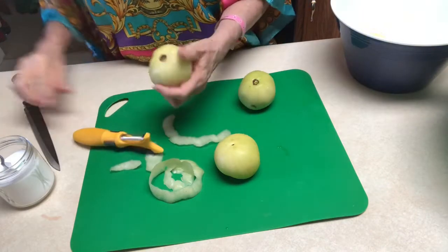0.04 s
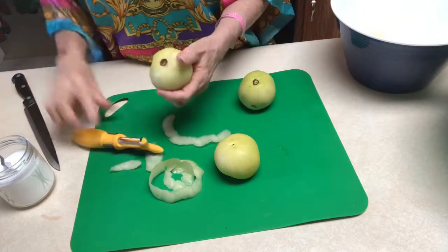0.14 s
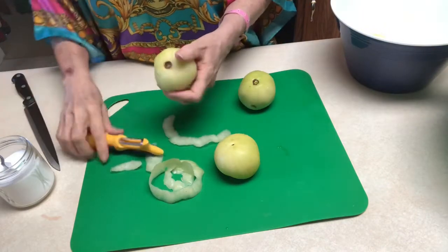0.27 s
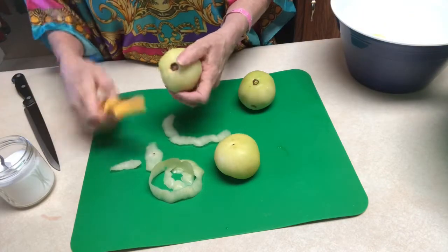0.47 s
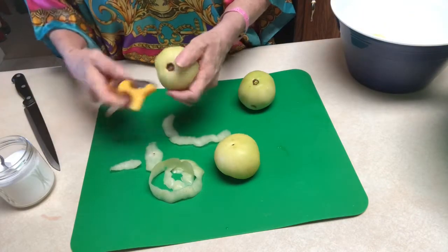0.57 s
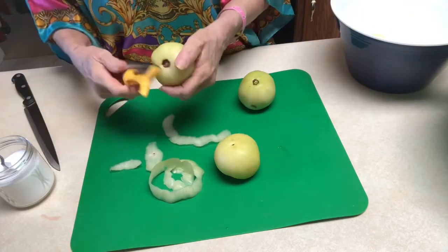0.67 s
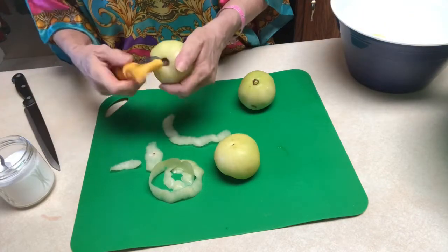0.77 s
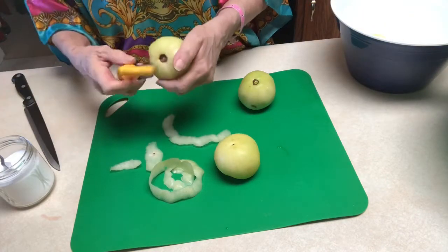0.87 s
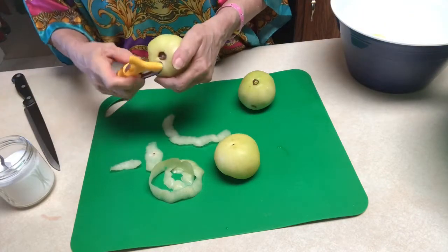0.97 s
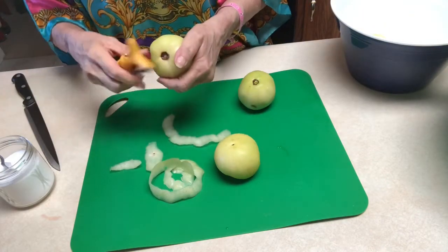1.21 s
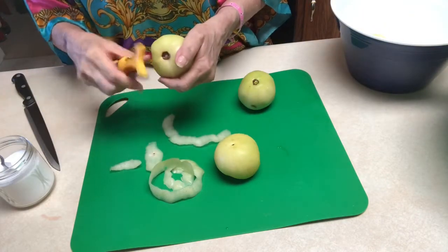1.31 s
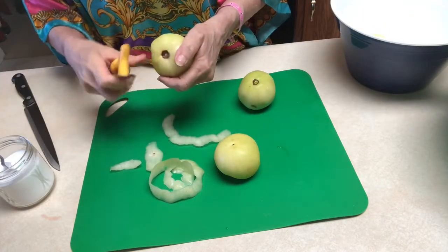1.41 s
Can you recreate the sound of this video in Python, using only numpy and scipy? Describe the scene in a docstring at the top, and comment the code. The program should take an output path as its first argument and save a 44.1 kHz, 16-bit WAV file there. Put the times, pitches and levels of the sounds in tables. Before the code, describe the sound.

Vegetable peeler clatters off a cutting board, then clicks and scrapes lightly over firm tomato skin

```python
"""A faint hollow ring dies away over room air and a low hum; fingers brush, then a peeler is picked up.
Its plastic handle knocks and skids with a short judder: pulses excite damped modes of handle and counter.
Its loose steel blade ticks (noise bursts and modal rings) and rasps over the skin of a firm tomato in
short strokes (filtered friction noise). Decaying noise gives the brief reverberation of a small kitchen."""
import sys
import numpy as np
from scipy import signal
from scipy.fft import rfft, irfft, next_fast_len
from scipy.io import wavfile

SR = 44100
rng = np.random.default_rng(int(sys.argv[2]) if len(sys.argv) > 2 else 0)


def int16_out(signal):
    """Quantize to a 16-bit WAV file."""
    q = np.round(np.clip(np.atleast_2d(signal).T, -1, 1) * 32767)
    wavfile.write(sys.argv[1], SR, q.astype(np.int16))


N = 63945  # length of the scene in samples

# Handle knocks on the board: [t/s, level/dB, contact time/ms, crack level/dB, counter thump level/dB]
KNOCKS = [(0.2163, -25.5, 0.2, -10.5, -41), (0.2223, -30.5, 0.14, -20, -43), (0.2265, -28, 0.58, -34, -44),
          (0.2358, -45, 0.18, -23, -54), (0.239, -40, .2, -20, -75), (0.2547, -34.5, 0.27, -42, -43.5)]
# Skids of the handle on the board: [t/s, length/s, slip rate f/Hz, level/dB, grit level/dB]
SKIDS = [(0.2391, 0.011, 1395, -27.5, -31), (0.2514, .0035, 1482, -26.5, -32.5)]
# Modes of the handle lying on the board: [f/Hz, relative level/dB, t60/s]
HANDLE_MODES = [(934, -5, 0.039), (1068, -1, 0.058), (1228, -2.5, 0.034), (1326, -12, 0.073),
                (1481, -5.5, 0.034), (1907, -8.5, 0.064), (2160, -13, 0.025), (2639, -17, 0.031),
                (3168, -19, 0.033), (3630, -25, 0.05), (3850, -44, 0.013), (4680, -21, 0.034),
                (5810, -26, 0.036), (6500, -17.5, 0.027), (7460, -29, 0.023)]
# Modes of the counter: [f/Hz, relative level/dB, t60/s]
COUNTER_MODES = [(123, -22, 0.093), (140.7, 3, 0.12), (251, -4, 0.11), (361, 0.5, 0.086)]
# Spectrum of the contact crack and skid grit: [f/Hz, relative level/dB]
CRACK_SPECTRUM = [(200, -39), (600, 7), (900, 11.5), (1300, -9), (2000, 7), (3300, 2.5), (4600, 5.5),
                  (5300, -6), (7500, -9), (10000, -18.5), (16000, -27)]
# Ticks of the loose blade in its pivots: [t/s, click level/dB, ring level/dB, strongest ringing f/Hz]
TICKS = [(0.3713, -37, -69, 5140), (0.4412, -55, -66.5, 7440), (0.4808, -30.5, -66, 6360),
         (0.4900, -45, -58, 5300), (0.5502, -25, -66, 5200), (0.5582, -21.5, -75, 5700),
         (0.5695, -37, -59, 5700), (0.6693, -30, -67, 5200), (0.7306, -34.5, -59, 3800),
         (0.7470, -42, -58, 5050), (0.7622, -27, -77, 6500), (0.7707, -56, -81, 5200),
         (0.795, -30, -56, 4770), (0.811, -47, -60.5, 5150), (0.8620, -30.5, -82, 4800),
         (0.8767, -32, -57, 10300), (0.9050, -55, -65, 5190), (1.03, -36, -69, 4860),
         (1.0390, -54, -86, 4800), (1.2152, -41, -58, 2480), (1.2700, -39, -59, 12600),
         (1.3707, -55, -54, 2430), (1.4180, -44, -69, 8450)]
# Modes of the steel blade: [f/Hz, relative level/dB, t60/s]
BLADE_MODES = [(2490, 0, .06), (4790, -6, .1), (5190, 0, .16), (5696, -4, .28), (6444, -3, .12),
               (8520, -6, .09), (9168, -11, .28), (9778, -2, .19), (14180, -1, .14)]
# Rasps of the blade: [t/s, length/s, level/dB, treble tilt/(dB per octave), contact resonance f/Hz]
RASPS = [(0.378, .014, -60, -4, 4950), (0.439, .012, -61.5, 1, 8300), (0.48, 0.035, -60, 1.5, 5300),
         (0.507, 0.0174, -53, 0.5, 5360), (0.539, 0.019, -56.5, -2.5, 6000), (0.558, 0.019, -45, 0, 3100),
         (0.679, 0.018, -58, -.5, 8100), (0.742, 0.02, -50, -2.5, 5000), (0.760, 0.02, -46.5, 1.5, 6100),
         (0.775, .040, -60.5, -0.5, 5160), (0.809, 0.012, -53, 3, 5300), (0.876, .015, -55, -2, 3700),
         (1.015, .036, -63, -4.5, 4900), (1.215, .006, -58.5, 6.5, 7700), (1.261, 0.022, -55, 1, 6750),
         (1.372, 0.0099, -67, 1.5, 4670), (1.4155, 0.0073, -60.5, 8, 8300)]
# Spectrum of blade rasps and clicks: [f/Hz, relative level/dB]
RASP_SPECTRUM = [(300, -19.5), (1000, -19), (1800, -9.5), (2400, -6), (3200, -1), (4100, -3), (5200, 1),
                 (6000, -5.5), (7700, -4.5), (9500, -11), (11000, -12), (13000, -19), (14500, -18),
                 (16000, -31)]
# Finger brushes on fruit and board: [t/s, length/s, level/dB, treble tilt/(dB per octave),
# contact resonance f/Hz]
BRUSHES = [(0.085, .05, -64.5, 5, 2700), (0.172, 0.054, -60, -4, 1390), (1.01, 0.036, -63, -10, 1190),
           (1.085, 0.043, -66.5, -0.5, 980)]
# Spectrum of the finger brushes: [f/Hz, relative level/dB]
BRUSH_SPECTRUM = [(200, -15), (700, 1), (1200, 7), (2600, 1), (5000, -14), (12000, -43)]
# Bands of the hollow ring: [centre f/Hz, full width at half amplitude/Hz, initial rms level/dB]
FADING_BANDS = [(587, 61, -51), (650, 160, -51), (358, 220, -54.5), (1390, 6600, -56)]
# Spectrum of the room reflections: [f/Hz, relative level/dB]
ROOM_SPECTRUM = [(100, -5.5), (400, -4), (800, 2), (980, -2), (1130, 0), (1380, -7), (1580, 3), (1760, -14),
                 (2150, -2), (2900, -1), (4600, 0.5), (9000, 0), (15000, 3.5)]
# Spectrum of the room air: [f/Hz, relative level per Hz/dB]
AIR_SPECTRUM = [(18, -35), (30, -34), (95, -4), (165, -3), (499, -2), (1250, -14.5), (1590, -18.5),
                (2480, -19), (2750, -22.5), (3980, -21), (5040, -26), (5450, -22), (6210, -25.5),
                (11700, -34.5), (16000, -41.5)]
# Tones of the appliance hum: [f/Hz, rms level/dB]
HUM = [(60, -74), (119, -70.5), (237, -73.5), (359, -81)]

CRACK_DECAY_S, TICK_DECAY_S = 0.002, 0.0012  # time constants of the noise bursts
SLIP_JITTER = 0.25  # relative spread of the slip rate, drawn anew at each sample
BOARD_LOW_HZ = 107
RING_FALL_DB_PER_OCTAVE = 11
CATCHES_PER_S, CATCH_DECAY_S = 1400, 0.00042
STROKE_RISE, STROKE_FALL = 0.22, 0.18  # shares of the stroke length
CONTACT_DB, CONTACT_OCTAVES = 3, 0.17  # height, and half width at half height, of the contact resonance
ROOM_DB, ROOM_T60_S, ROOM_TREBLE_T60_S, ROOM_BUILD_S = -8.5, 0.43, 0.27, 0.0033
ROOM_SPLIT_HZ = 3000
FADING_T60_S = 0.25
AIR_DB = -60  # rms level
TOP_HZ = 15900


def undb(db):
    """Level definition: an amplitude ratio is ten to the power of level/20."""
    return 10 ** (np.asarray(db) / 20)


def unit(x):
    """Mean-square normalisation: scale a signal to rms 1."""
    return x / np.sqrt(np.mean(x ** 2) + 1e-20)


def add(out, at_s, x):
    """Superposition: add a sound to the scene at a given time."""
    start = max(int(at_s * SR), 0)
    out[start:start + len(x)] += x[:N - start]


def high_pass(x, order, hz):
    """Butterworth filtering: suppress what lies below the cutoff."""
    return signal.sosfilt(signal.butter(order, hz, "high", fs=SR, output="sos"), x)


def colour(x, points, tilt_db=0):
    """Minimum-phase filtering: a folded cepstrum makes a spectrum causal, tilted about 5 kHz."""
    size = 2 * next_fast_len(len(x) // 2 + 2048)
    octave = np.log2(np.maximum(np.fft.rfftfreq(size, 1 / SR), 1))
    hz, db = np.array(points).T
    # the tilt stays constant from three octaves below its pivot downwards
    slope = np.maximum(octave - np.log2(5000), -3)
    level_db = np.interp(octave, np.log2(hz), db) + tilt_db * slope
    cepstrum = irfft(np.log(undb(level_db)))
    cepstrum[1:size // 2] *= 2
    cepstrum[size // 2 + 1:] = 0
    response = np.exp(rfft(cepstrum))
    return irfft(rfft(x, size) * response)[:len(x)]


def fade(t60):
    """Exponential damping: the level falls by 60 dB in t60 seconds."""
    return np.exp(-np.log(1000) * np.arange(N) / SR / t60)


def damped_mode(hz, db, t60):
    """Free vibration: one mode is an exponentially damped sine."""
    t = np.arange(N) / SR
    return undb(db) * fade(t60) * np.sin(2 * np.pi * hz * t)


def ring(force, modes):
    """Modal superposition: a force convolves with damped modes of alternating sign."""
    response = sum((-1) ** k * damped_mode(*mode) for k, mode in enumerate(modes))
    return signal.fftconvolve(force, response)[:N]


def burst(decay_s):
    """Impulsive contact: exponentially decaying noise of unit energy."""
    t = np.arange(SR // 50) / SR
    noise = rng.standard_normal(len(t)) * np.exp(-t / decay_s)
    return noise / np.linalg.norm(noise)


def swell(length_s, rise, fall):
    """Contact pressure: one stroke rises, holds and releases linearly."""
    progress = np.arange(SR // 10) / SR / length_s
    return np.clip(np.minimum(progress / rise, (1 - progress) / fall), 0, 1)


def friction():
    """Dry friction: equal catches at random times modulate noise, each as a short crackle."""
    count = SR // 10
    catches = (rng.random(count) < CATCHES_PER_S / SR).astype(float)
    grip = signal.lfilter([1], [1, -np.exp(-1 / (CATCH_DECAY_S * SR))], catches)
    # the constant keeps a little noise between catches
    return unit((unit(grip) + 0.5) * rng.standard_normal(count))


def handle():
    """Impact and stick-slip: pulses ring the handle; knocks also thump the counter, without deep bass."""
    push, crack, thump = np.zeros((3, N))
    t = np.arange(SR // 10) / SR
    for at, db, contact_ms, crack_db, thump_db in KNOCKS:
        # the pulse peaks after a quarter of the contact time
        blow = t * np.exp(-t * 4000 / contact_ms)
        blow /= blow.sum()
        add(push, at, undb(db) * blow)
        add(thump, at, undb(thump_db) * blow)
        add(crack, at, undb(crack_db) * burst(CRACK_DECAY_S))
    for at, length, slip_hz, db, grit_db in SKIDS:
        pressure = swell(length, rise=0.26, fall=0.42)
        slip_rate = slip_hz * (1 + SLIP_JITTER * rng.standard_normal(len(t)))
        cycles = np.cumsum(slip_rate) / SR
        slips = np.diff(np.floor(cycles), prepend=0)  # one impulse per completed cycle
        add(push, at, undb(db) * pressure * slips)
        add(crack, at, undb(grit_db) * pressure * friction())
    sound = ring(push, HANDLE_MODES) + ring(thump, COUNTER_MODES) + colour(crack, CRACK_SPECTRUM)
    return high_pass(sound, 4, BOARD_LOW_HZ)


def blade_ticks():
    """Modal excitation: a dry click and a thin steel ring; the contact point weights the modes."""
    click, rings = np.zeros((2, N))
    modes = np.array([damped_mode(*mode) for mode in BLADE_MODES])
    mode_hz = np.array(BLADE_MODES)[:, 0]
    for at, click_db, ring_db, ring_hz in TICKS:
        add(click, at, undb(click_db) * burst(TICK_DECAY_S))
        octaves = np.abs(np.log2(mode_hz / ring_hz))
        weights = undb(ring_db - RING_FALL_DB_PER_OCTAVE * octaves)
        add(rings, at, weights @ modes)
    return colour(click, RASP_SPECTRUM) + rings


def strokes(table, spectrum):
    """Sliding friction: short strokes of catching noise, each with the resonance of its contact."""
    out = np.zeros(N)
    reach = 2 ** (2 * CONTACT_OCTAVES)  # frequency ratio from the peak to its foot
    for at, length, db, tilt_db, contact_hz in table:
        peak = [(contact_hz / reach, 0), (contact_hz, CONTACT_DB), (contact_hz * reach, 0)]
        rub = colour(colour(friction(), spectrum, tilt_db), peak)
        pressure = swell(length, STROKE_RISE, STROKE_FALL)
        add(out, at, undb(db) * unit(rub) * pressure)
    return out


def fading_ring():
    """Resonant filtering: bands of noise form a faint hollow ring that dies away at the start."""
    f = np.fft.rfftfreq(N, 1 / SR)
    out = np.zeros(N)
    for hz, width, db in FADING_BANDS:
        resonance = 1 / (1 + (2 * (f - hz) / width) ** 2)
        band = irfft(rfft(rng.standard_normal(N)) * resonance, N)
        out += undb(db) * unit(band)
    return out * fade(FADING_T60_S)


def kitchen(x):
    """Diffuse reverberation: convolution with decaying noise whose treble dies sooner."""
    low_pass = signal.butter(2, ROOM_SPLIT_HZ, fs=SR, output="sos")
    low = signal.sosfilt(low_pass, rng.standard_normal(N))
    treble = high_pass(rng.standard_normal(N), 2, ROOM_SPLIT_HZ)
    tail = low * fade(ROOM_T60_S) + treble * fade(ROOM_TREBLE_T60_S)
    tail *= np.clip(np.arange(N) / SR / ROOM_BUILD_S, 0, 1)  # reflections build up linearly
    tail = colour(tail / np.linalg.norm(tail), ROOM_SPECTRUM)
    return undb(ROOM_DB) * signal.fftconvolve(x, tail)[:N]


def appliance_hum():
    """Steady periodic sound: a sum of sines of random phase."""
    t = np.arange(N) / SR
    # the square root of two converts rms to peak amplitude
    return sum(undb(db) * np.sqrt(2) * np.sin(2 * np.pi * (hz * t + rng.random())) for hz, db in HUM)


def room_air():
    """Stationary random sound: noise filtered to the spectrum of the room air."""
    return undb(AIR_DB) * unit(colour(rng.standard_normal(N), AIR_SPECTRUM))


def scene():
    """Superposition of direct sound, reflections and background."""
    rasps = strokes(RASPS, RASP_SPECTRUM)
    brushes = strokes(BRUSHES, BRUSH_SPECTRUM)
    near = handle() + blade_ticks() + rasps + brushes
    background = fading_ring() + appliance_hum() + room_air()
    return (near + kitchen(near) + background)[None]  # one channel


def record(dry):
    """Band limiting: the recorder cuts the top with a steep elliptic low-pass."""
    low_pass = signal.ellip(10, 0.2, 70, TOP_HZ, fs=SR, output="sos")  # ripple and stopband in dB
    return signal.sosfilt(low_pass, dry)


dry = scene()
out = record(dry)
int16_out(out)
```